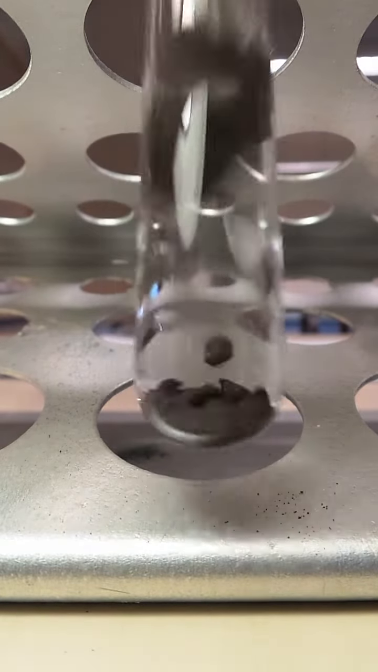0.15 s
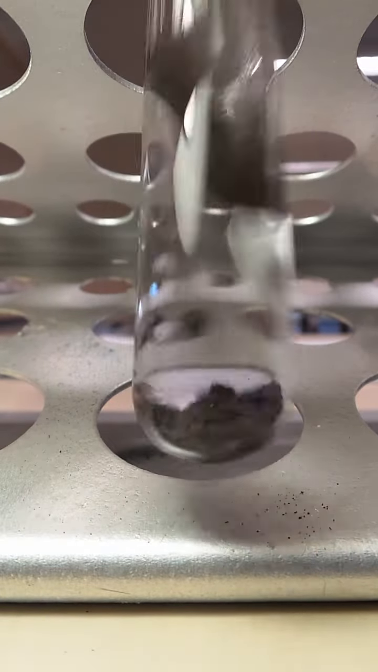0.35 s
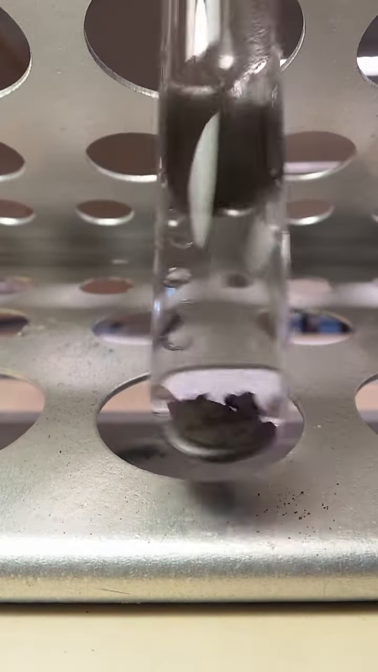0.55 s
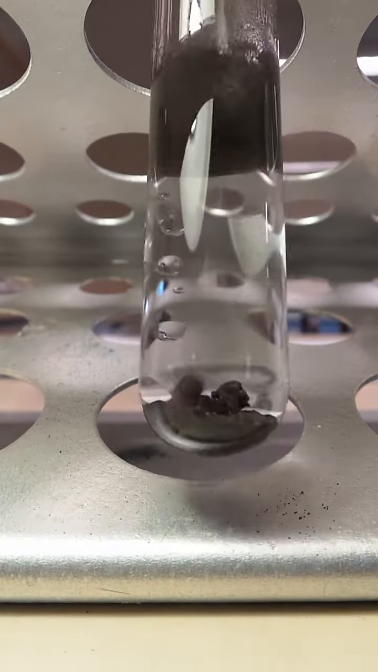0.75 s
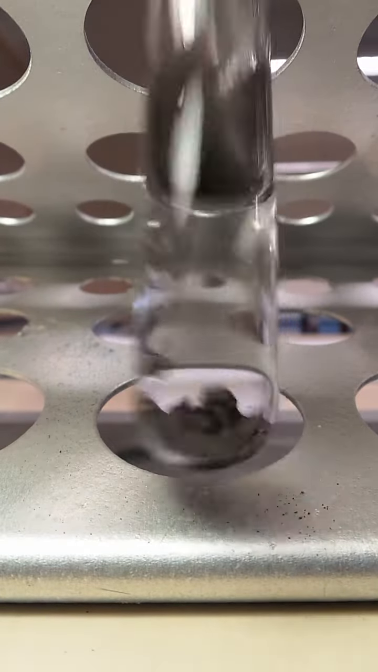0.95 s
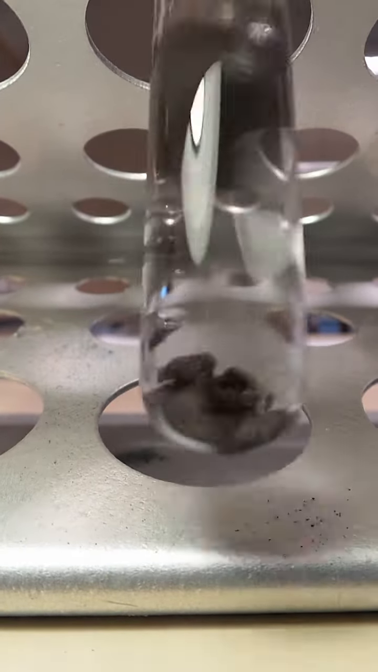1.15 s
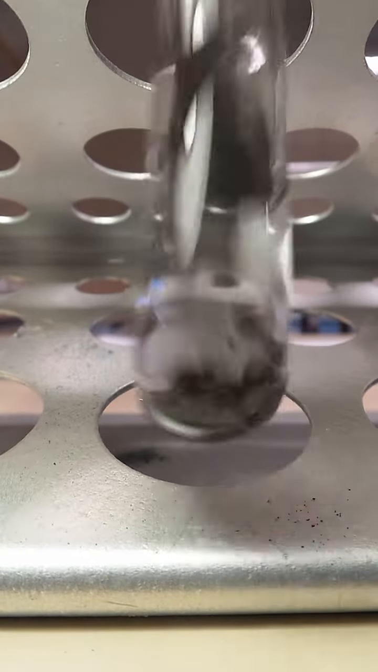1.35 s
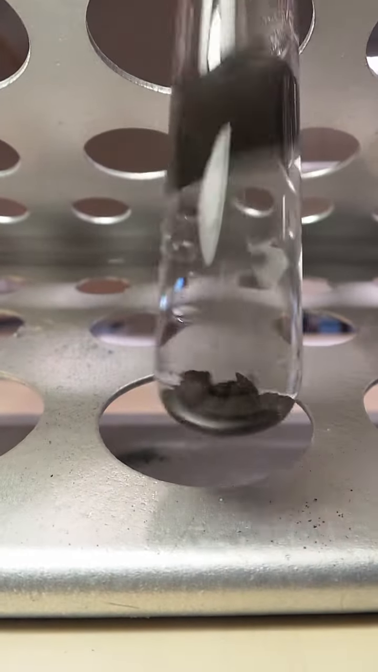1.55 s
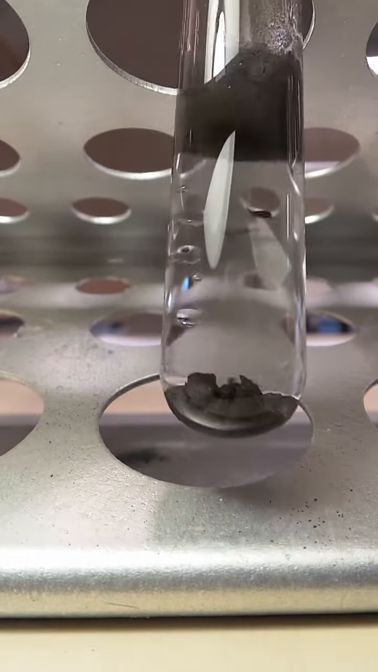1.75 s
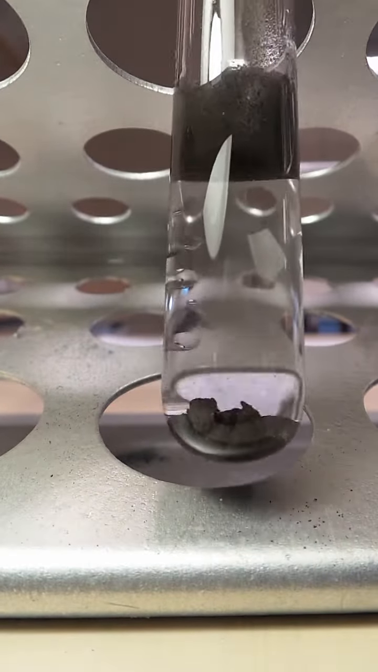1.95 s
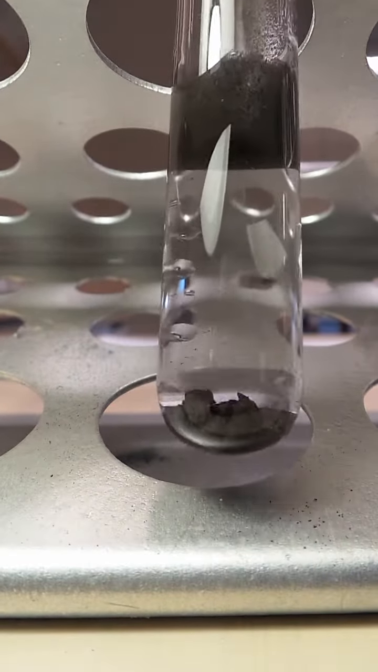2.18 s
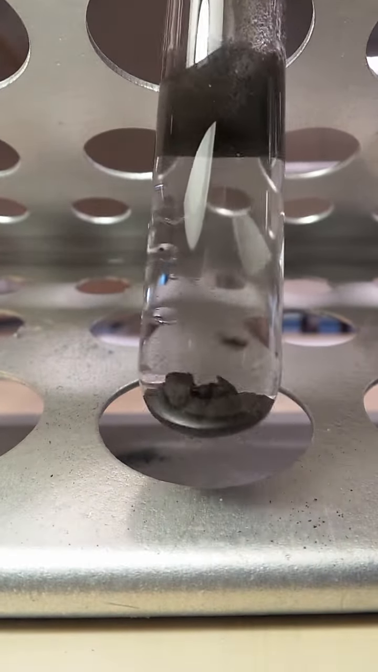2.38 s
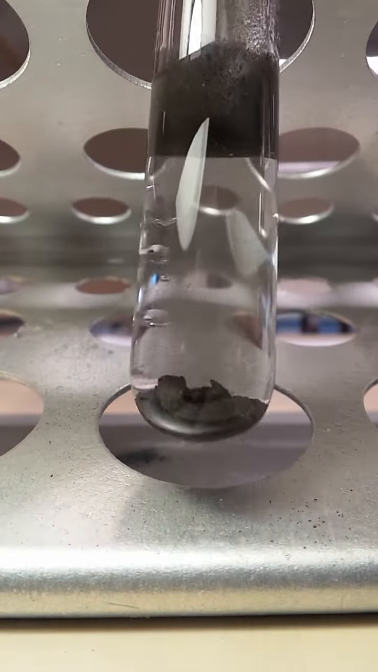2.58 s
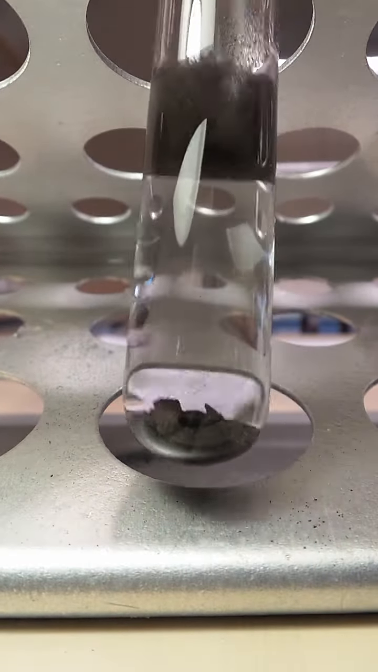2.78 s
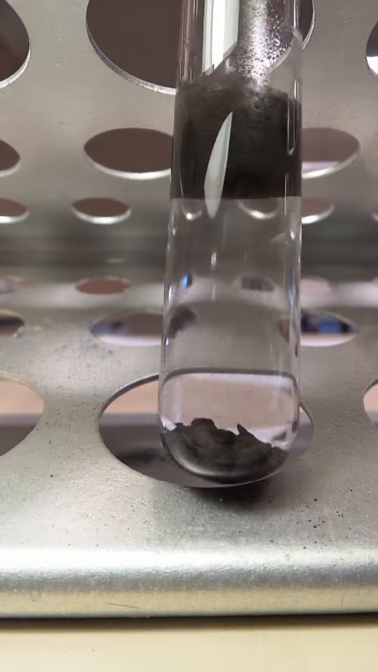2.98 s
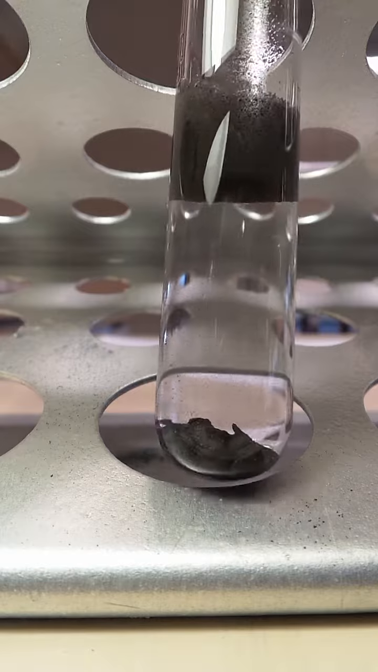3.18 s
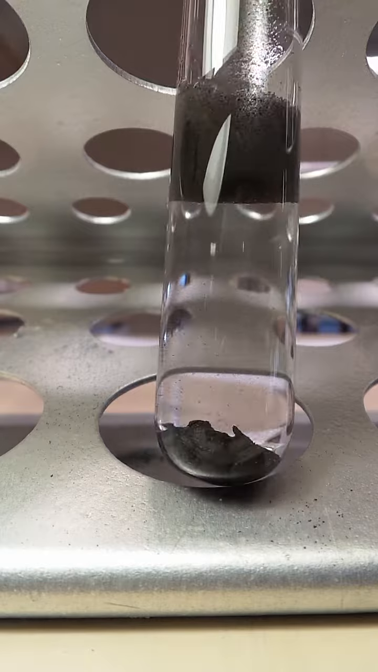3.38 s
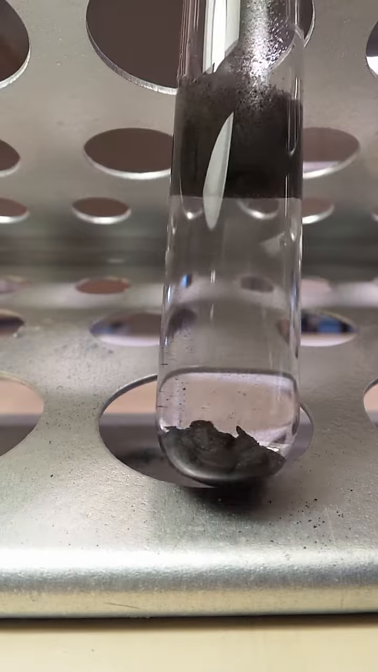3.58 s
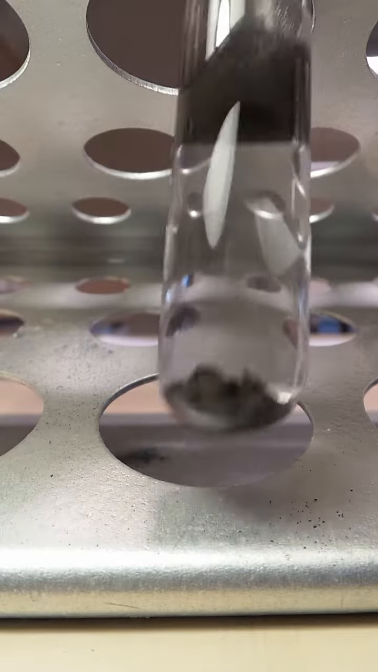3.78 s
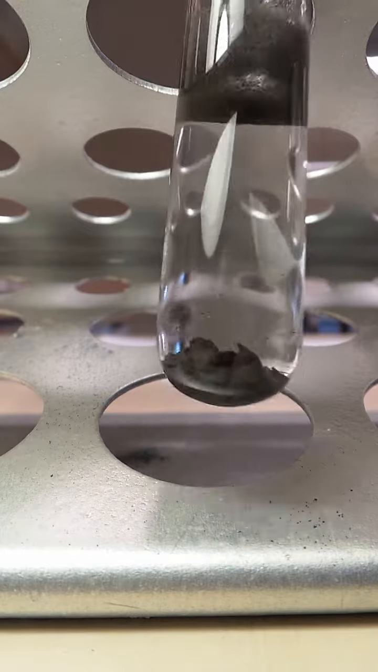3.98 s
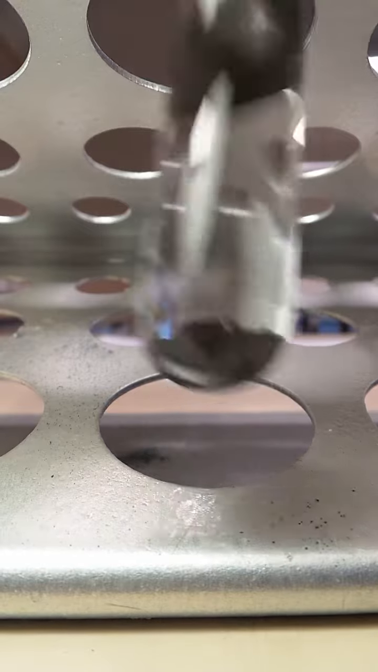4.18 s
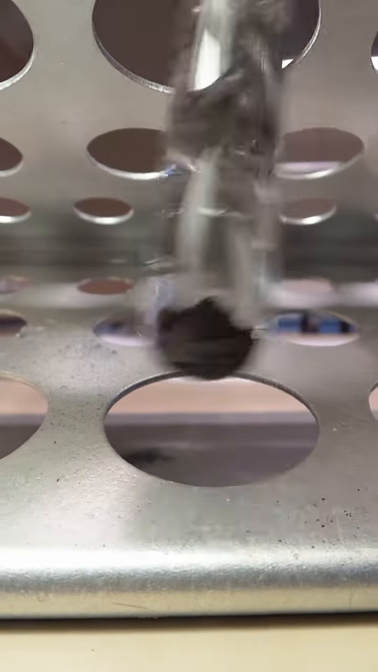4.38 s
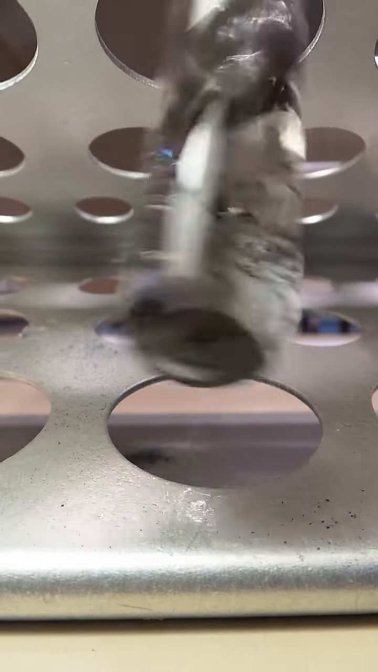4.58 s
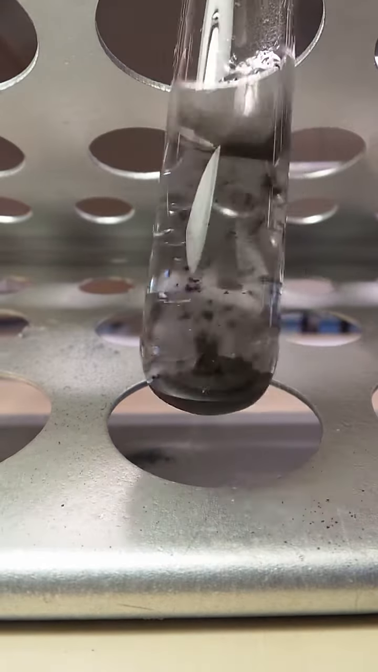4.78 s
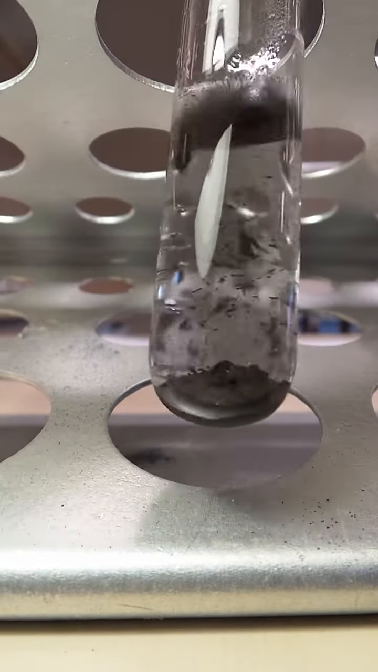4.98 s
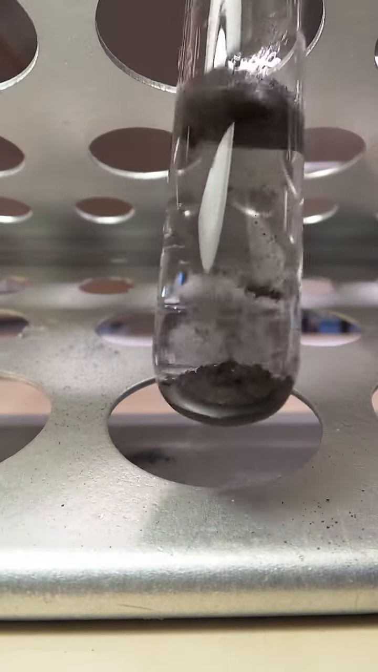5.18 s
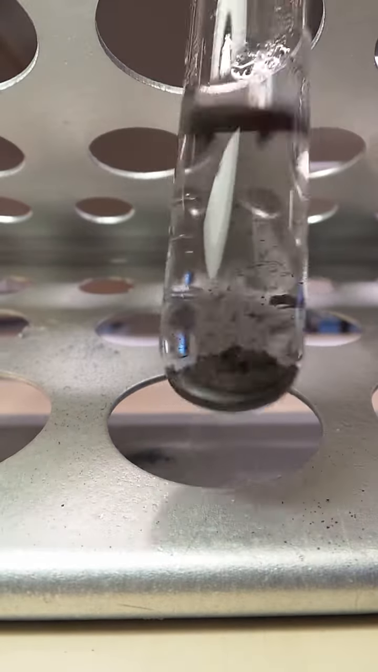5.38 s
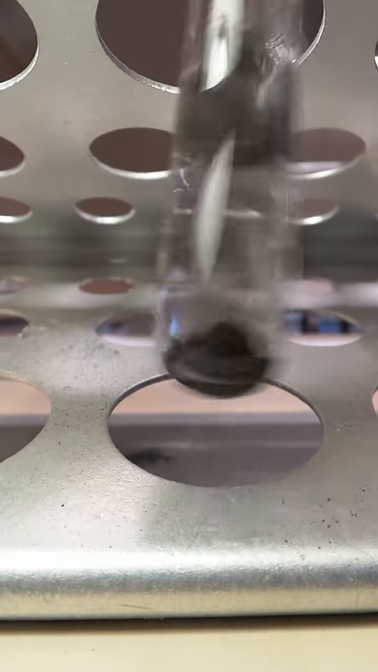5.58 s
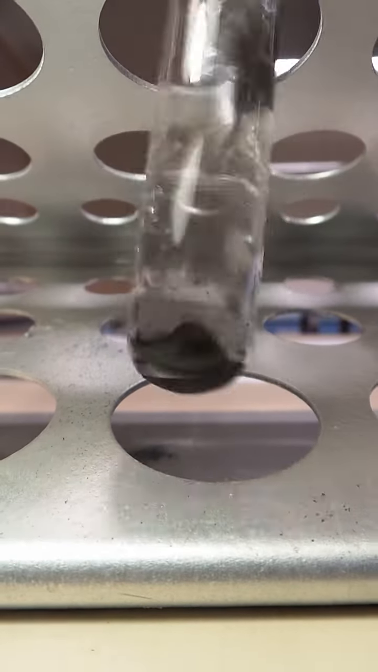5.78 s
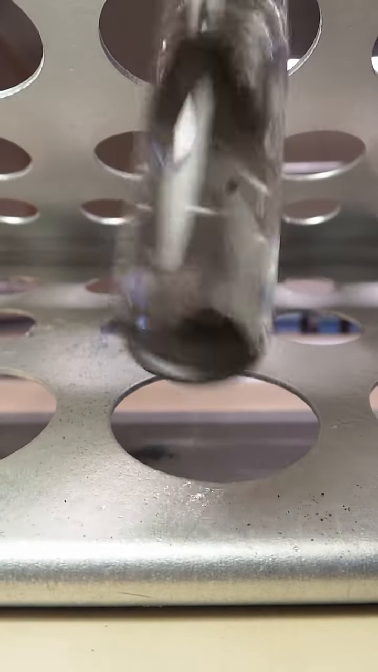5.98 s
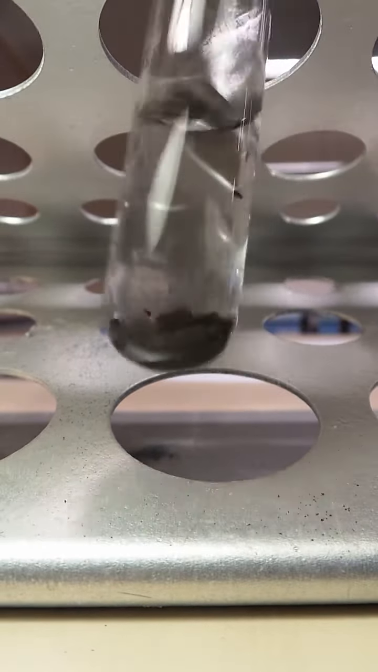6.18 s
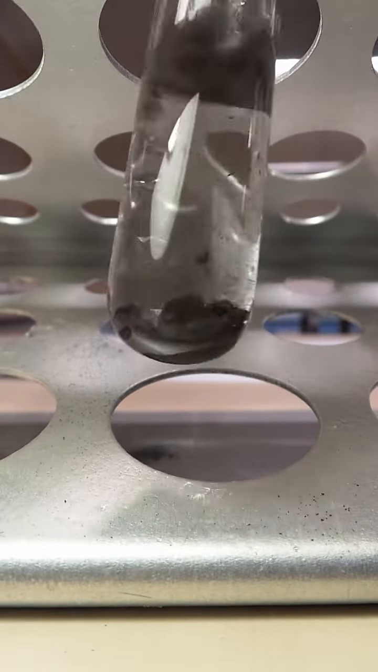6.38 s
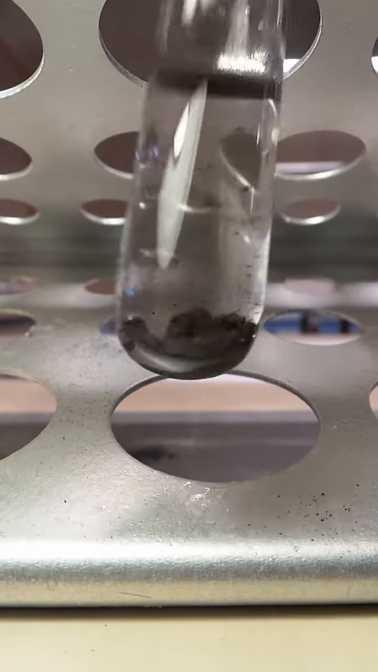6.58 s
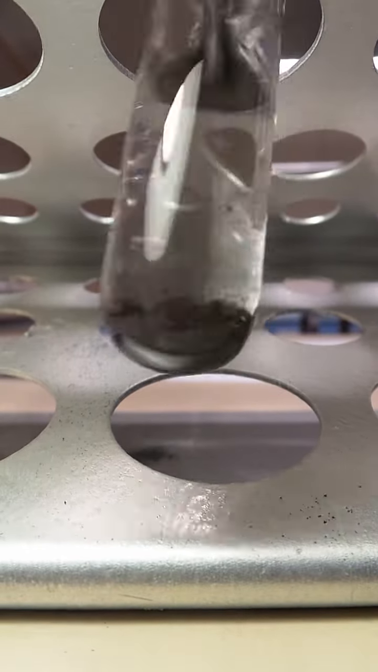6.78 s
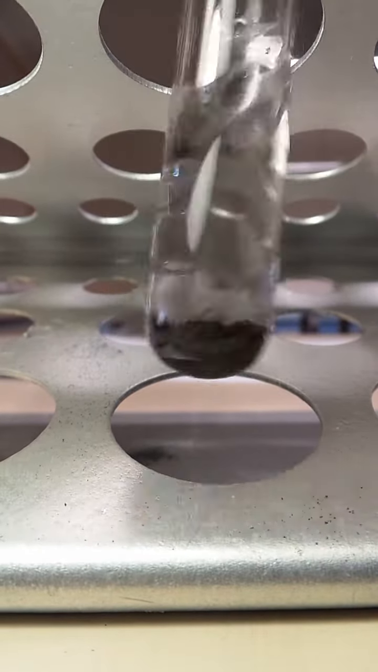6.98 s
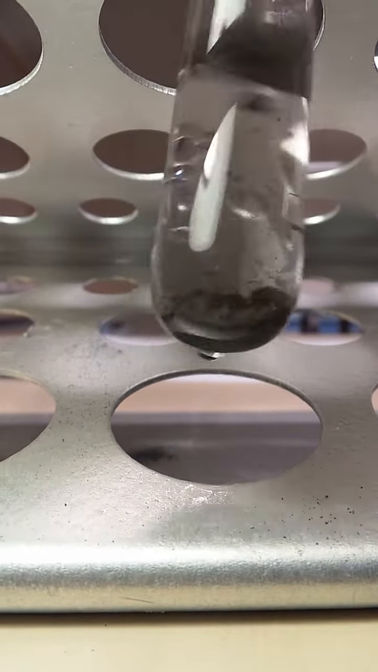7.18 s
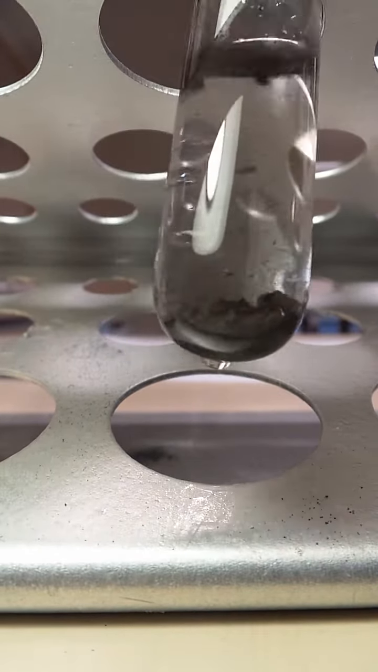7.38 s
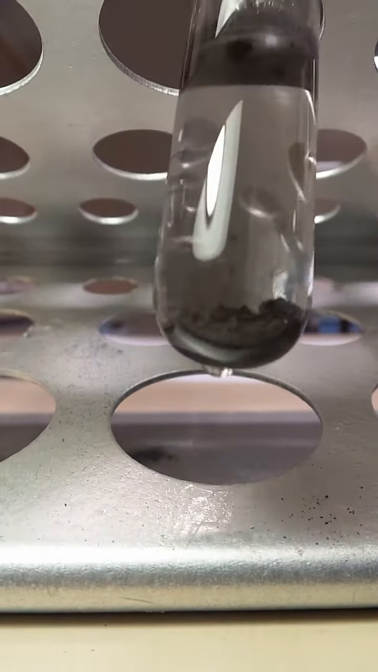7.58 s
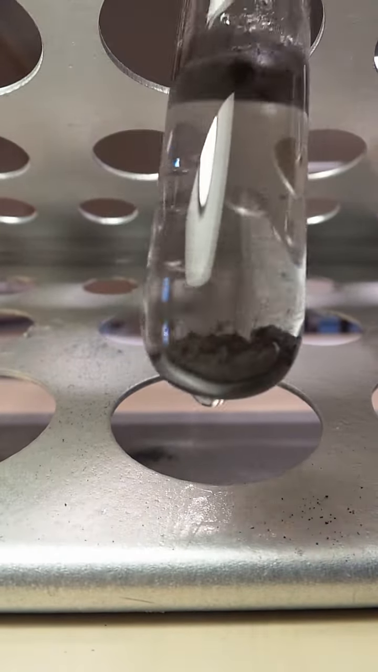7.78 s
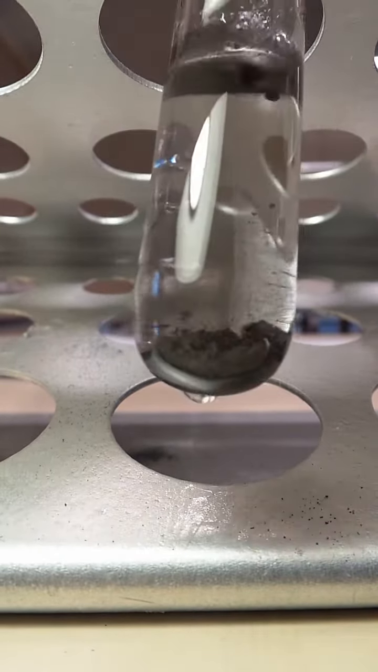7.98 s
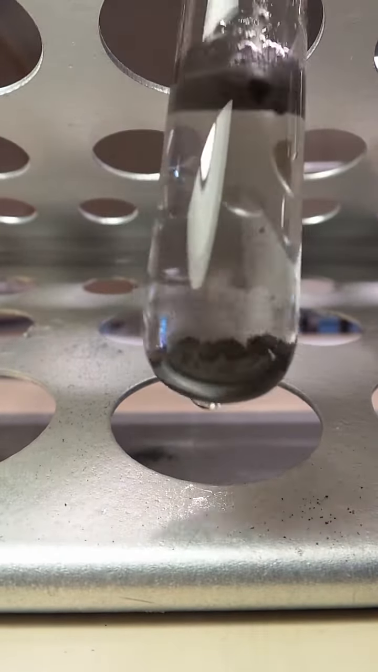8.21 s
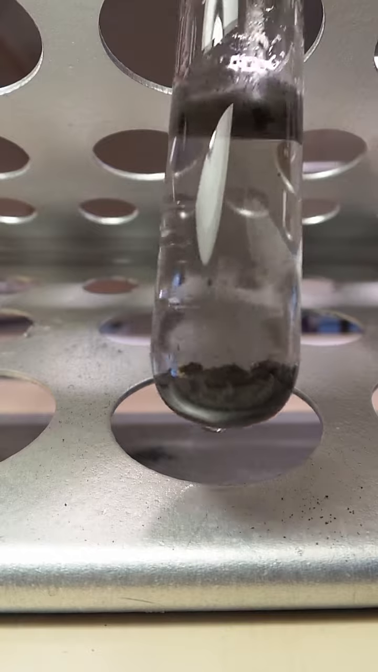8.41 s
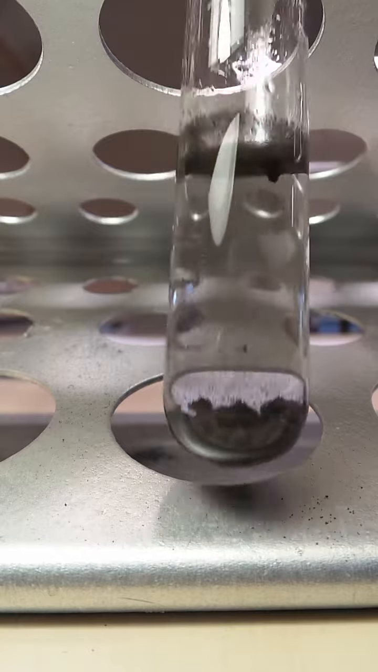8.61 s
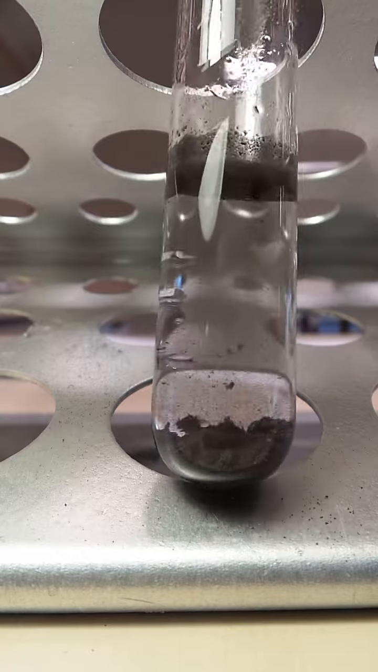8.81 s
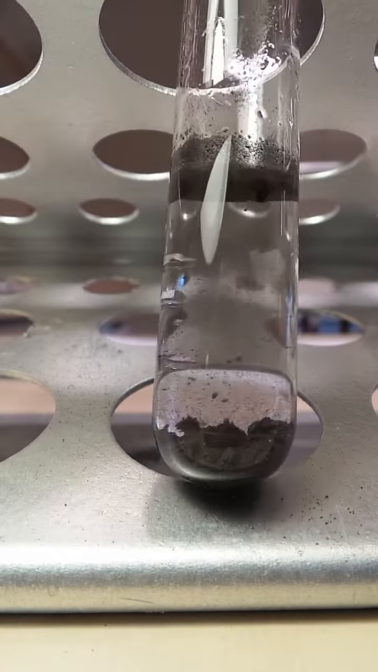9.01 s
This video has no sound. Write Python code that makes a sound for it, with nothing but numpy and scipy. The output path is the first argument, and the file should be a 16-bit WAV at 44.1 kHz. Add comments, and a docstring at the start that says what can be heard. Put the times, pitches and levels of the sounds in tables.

```python
"""Glass test tube shaken in a metal rack

A glass test tube of liquid is shaken by hand in the hole of a perforated sheet-metal rack, close to a phone.
It knocks and rebounds in five bursts; decaying sine waves ring tube and rack, filtered noise gives crack and thud.
Grains of the same ringing make it drag, short sine notes squeak, and decaying noise adds a faint room tail.
Shaped noise hums as ventilation behind it, and the phone's limiter holds down the hardest knocks."""
import sys
import numpy as np
from scipy import signal
from scipy.fft import rfft, irfft
from scipy.io import wavfile
from scipy.ndimage import uniform_filter1d, minimum_filter1d

SR = 44100
rng = np.random.default_rng(int(sys.argv[2]) if len(sys.argv) > 2 else 0)


def master_out(mix):
    """Clip the mix to full scale and print it as 16-bit PCM to the path in sys.argv[1]."""
    frames = np.transpose(np.atleast_2d(mix))
    ceiling = np.clip(frames, -1, 1)
    pcm = np.round(ceiling * 32767).astype(np.int16)
    wavfile.write(sys.argv[1], SR, pcm)


N = 399105  # samples in the scene
RING_SIZE = 24000  # samples in one contact


def undb(db):
    """Turn decibels into gain."""
    return 10 ** (np.asarray(db) / 20)


def gains(points, hz):
    """Gain at hz of (f/Hz, level/dB) points joined by lines on a log-frequency axis."""
    f, db = np.transpose(points)
    return undb(np.interp(np.log(hz + 1), np.log(f), db))


def colour(x, points):
    """Filter with the gain of (f/Hz, level/dB) points; it never acts early, so attacks stay sharp."""
    size = 2 * len(x)
    cepstrum = irfft(np.log(gains(points, np.fft.rfftfreq(size, 1 / SR))))
    # folding the cepstrum onto its first half gives the minimum-phase filter
    cepstrum[1:len(x)] *= 2
    cepstrum[len(x) + 1:] = 0
    response = np.exp(rfft(cepstrum))
    return irfft(rfft(x, size) * response)[:len(x)]


def fade(t, t60):
    """Decay that loses 60 dB in t60 seconds."""
    return np.exp(-np.log(1000) * t / t60)


def add(track, sound, at):
    """Mix a sound into the track at a time in seconds."""
    start = int(at * SR)
    track[start:start + len(sound)] += sound[:N - start]


def ventilation(swell_db=0.5):
    """Rushing air with narrow droning resonances; the flow swells a little."""
    # smooth ventilation noise: f/Hz, level/dB per Hz
    air_points = [(18, -98), (27, -72), (42, -68.5), (80, -52), (200, -52), (290, -58), (430, -70),
                  (620, -65.5), (900, -72), (1400, -80.5), (2300, -82), (4000, -86.5), (7000, -95),
                  (10500, -108), (15000, -113)]
    # duct and room resonances that the fan drives: f/Hz, width/Hz, level/dB per Hz
    resonances = [(100.9, 1.9, -46.5), (260, 9.5, -52.5), (337.3, 27, -54.5), (366.5, 9.5, -52),
                  (394, 19, -58), (464, 22, -59.5), (493, 14.4, -58), (514, 13, -62), (752.6, 12.6, -60),
                  (794, 16, -68.5), (843, 15, -66.5), (1218, 180, -78.5), (1693, 136, -78.5)]
    hz = np.fft.rfftfreq(N, 1 / SR)
    power = gains(air_points, hz) ** 2
    for centre, width, db in resonances:
        power = power + undb(db) ** 2 / (1 + ((hz - centre) / width) ** 2 * 2) ** 2
    air = irfft(rfft(rng.standard_normal(N)) * np.sqrt(power * SR / 2), N)
    flow = signal.resample(rng.standard_normal(size=18), N)  # slow random curve
    return air * undb(swell_db * flow)


def drone(centre_hz=170.2, width_hz=9, level_db=-30):
    """The strongest duct resonance, rung by turbulence, so that it swells and sinks at random."""
    hz = np.fft.fftfreq(N, 1 / SR)
    resonance = 1 / (1 + ((hz - centre_hz) / width_hz) ** 2)
    ring = np.fft.ifft(np.fft.fft(rng.standard_normal(N)) * resonance).real
    return undb(level_db) * ring / np.std(ring)


def room(x, wet_db=-23, low_t60=0.95, high_t60=0.34, split_hz=4500, build_s=0.011, treble_db=-15):
    """Diffuse noise tail, like reflections, that builds up quickly and loses its treble first."""
    t = np.arange(SR) / SR
    low_pass = signal.butter(2, split_hz, fs=SR, output="sos")
    high_pass = signal.butter(2, split_hz, "high", fs=SR, output="sos")
    low = signal.sosfilt(low_pass, rng.standard_normal(SR))
    high = signal.sosfilt(high_pass, rng.standard_normal(SR))
    tail = low * fade(t, low_t60) + undb(treble_db) * high * fade(t, high_t60)
    tail = tail * (1 - np.exp(-t / build_s))
    tail = tail / np.sqrt(np.sum(tail ** 2))  # unit energy
    return undb(wet_db) * signal.fftconvolve(x, tail)[:N]


def squeaks(rise_s=0.0017):
    """Brief pure notes that swell as the glass slips and die as it grips again."""
    # the glass skids on the rim, each time on one note: t/s, f/Hz, level/dB, t60/s
    squeak_notes = [(1.116, 2220, -22, .05), (1.491, 2195, -11.5, 0.063), (1.502, 4292, -18, 0.048)]
    t = np.arange(RING_SIZE) / SR
    out = np.zeros(N)
    for at, hz, db, t60 in squeak_notes:
        envelope = (1 - np.exp(-t / rise_s)) * fade(t, t60)
        add(out, undb(db) * np.sin(2 * np.pi * hz * t) * envelope, at)
    return out


def drag(grains_per_s=550, spread_db=2.0, treble_db=-6, ring_length=0.7, light=0.3, spot_count=4):
    """Glass chattering along the edge of the hole: tiny slips at a few spots, each ringing tube and rack."""
    # times when the tube drags along the rim: start/s, end/s, relative level/dB
    drag_times = [(1.485, 1.55, -29), (4.39, 4.492, -35), (4.53, 4.587, -25), (4.603, 4.68, -38),
                  (4.677, 4.753, -33.5), (5.804, 5.9, -32.5), (7.11, 7.17, -36.5)]
    t = np.arange(N) / SR
    pressure = np.zeros(N)
    for start, end, db in drag_times:
        arch = np.sin(np.pi * np.clip((t - start) / (end - start), 0, 1))
        pressure += undb(db) * arch.clip(0) ** .5
    chatter = np.zeros(N)
    for _ in range(spot_count):
        happens = rng.random(N) < grains_per_s / spot_count / SR
        slips = happens * undb(spread_db * rng.standard_normal(N))
        chatter += signal.oaconvolve(slips, clink(ring_length, light, clank_hz=2100))[:N]
    chatter = colour(chatter, [(700, 1), (2800, 3), (4100, -6.5), (5400, 10), (6600, -5.5),
                               (8000, 1.5), (11000, treble_db)])
    return pressure * chatter / np.std(chatter)


def thud(level_db=-8, low_hz=240, high_hz=880, t60=0.61, rise_s=0.0011):
    """The whole rack flexes under a knock: low, slower to start and slower to die."""
    t = np.arange(RING_SIZE) / SR
    band = signal.butter(2, [low_hz, high_hz], "band", fs=SR, output="sos")
    flex = signal.sosfilt(band, rng.standard_normal(RING_SIZE))
    return undb(level_db) * flex * fade(t, t60) * (1 - np.exp(-t / rise_s))


def after_ring(light, light_db=-1.0, scatter_db=5.0, detune=0.0011, waver=0.0013, slosh_hz=28):
    """The thin, long ring of the glass; sloshing liquid wavers and detunes it, so successive knocks beat."""
    # glass modes that the hand hardly damps, so they sing on between knocks: f/Hz, relative level/dB, t60/s
    glass_modes = [(4145, -37, .3), (4472, -29.5, 0.32), (6565, -36, 0.26), (7947, -33.5, .3),
                   (9420, -36.5, 0.59), (11265, -36.5, .3), (11650, -30, 0.47), (13322, -34, .34)]
    t = np.arange(RING_SIZE) / SR
    hz, db, t60 = np.transpose(glass_modes)[:, :, None]
    spot, slosh, pace = rng.standard_normal((3, len(hz), 1))
    # all modes waver together, at a random rate and phase; detune and waver are fractions of the pitch
    wobble = np.sin(2 * np.pi * (slosh_hz * np.exp(pace[0] / 2) * t + pace[1]))
    bend = detune * slosh + waver * wobble
    swing = np.sin(2 * np.pi * hz * np.cumsum(1 + bend, axis=1) / SR)
    gain = undb(light * light_db + db + scatter_db * spot)
    return np.sum(gain * fade(t, t60) * swing, axis=0)


def clink(length, light, clank_hz, modes_db=-7, scatter_db=2.5, detune=0.0011, crack_db=-10, crack_t60=0.034,
          sheet_db=-18, sheet_t60=0.28, light_db=-3.0, damping_db=-3, top_damping_db=-10):
    """Glass meets metal: clear modes, a hard crack and the sheet's wash; light taps (0-1) favour other modes.

    The length factor scales every decay time.
    """
    # what tube and rack ring with: f/Hz, relative level in a hard knock/dB,
    # t60 before the length factor/s, extra level in a light tap/dB
    clear_modes = [(464.7, -10.5, 0.17, 2), (720, -2.5, 0.079, 0), (786, -15.5, 0.1, -4),
                   (893, -15, 0.12, 3), (983, -27.5, 0.049, 5), (1116, -12.5, 0.13, -5.5),
                   (1195, -11, 0.059, 2), (1624, -5, 0.023, -3.5), (1798, -4, 0.074, -3.5),
                   (2002, -2.5, 0.056, 1), (2122, -5.5, .04, -2), (2468, -4.5, 0.062, -3),
                   (2610, -7, 0.03, 3), (2670, -11.5, .06, -0.5), (2893, -8.5, 0.06, 2),
                   (3400, -14.5, .09, 4), (3650, -2.5, 0.027, 4.5), (3986, 7.5, 0.045, -8),
                   (4115, 14.5, 0.026, -10.5), (4190, -0.5, 0.09, -7.5), (4350, -4.5, .04, -4.5),
                   (4460, -6, 0.11, -7), (4550, -6, 0.037, -2), (4670, -2, 0.07, -4),
                   (4920, -1.5, 0.031, -3), (5100, -6.5, 0.056, 1.5), (5635, -4, 0.055, 4),
                   (6557, 4, 0.071, 0.5), (6636, -3.5, 0.08, 1), (6990, 2.5, 0.05, -7.5),
                   (7440, -4, .035, -8.5), (7930, -2, 0.086, -5), (8300, -14.5, 0.11, 4),
                   (8600, -9, 0.12, 1), (8990, -11, 0.06, -1), (9404, 4.5, 0.06, -4.5),
                   (10220, 1, 0.031, -8), (10600, 1, 0.022, -11.5), (11000, -4.5, .04, -8),
                   (11200, -9.5, 0.12, 9.5), (11800, -4, .025, -3.5), (11860, -9.5, 0.12, 9),
                   (12480, -8, .035, -4.5), (13150, -3, .03, -3), (13230, -3.5, 0.076, 6),
                   (13900, -5, .025, -1.5), (14490, -3.5, 0.041, -12.5)]
    # the crowded, well damped modes of the perforated sheet: f/Hz, relative level/dB
    sheet_points = [(150, -3.5), (400, 0), (660, 7.5), (1000, 0.5), (1400, 6), (2100, 11.5), (2700, 10),
                    (3200, 9), (4200, 16), (4800, 7), (6000, 10.5), (9000, 7), (11500, 13.5), (12400, -7),
                    (13200, 10.5), (14500, 0.5)]
    main_mode_db, main_share = 1, 0.67  # louder modes answer every knock, with only this share of the scatter
    tap_modes_db = -1.5  # change of all clear modes in a light tap
    t = np.arange(RING_SIZE) / SR
    clank = (clank_hz, 2.0, 0.044, -5)  # one more mode, in the same columns
    hz, db, t60, tap_db = np.transpose(list(clear_modes) + [clank])[:, :, None]
    # each contact lands on another spot, and the grip and the moving liquid shift the modes a little
    spot, grip, side = rng.standard_normal((3, len(hz), 1))
    spot = spot * np.where(db > main_mode_db, main_share, 1)
    early = t[:RING_SIZE // 2]
    swing = np.sign(side) * np.sin(2 * np.pi * hz * (1 + detune * grip) * early)
    gain = undb(db + light * (tap_db + tap_modes_db) + scatter_db * spot)
    modes = np.sum(gain * fade(early, t60 * length) * swing, axis=0)
    modes = np.pad(modes, (0, RING_SIZE - len(early)))
    noise = rng.standard_normal(RING_SIZE)
    crack = undb(crack_db) * fade(t, crack_t60 * length) * noise
    # the sheet shivers on after the crack, with less treble
    shiver = undb(sheet_db) * fade(t, sheet_t60 * length) * noise
    shiver = colour(shiver, [(4000, 0), (9000, damping_db), (13000, top_damping_db)])
    wash = colour(crack + shiver, sheet_points)
    return undb(modes_db) * modes + undb(light * light_db) * wash


def contact(db, clank_hz, clank_db, bite_db, ring_db, ping_db, sparkle_db, hard_db=-18, range_db=9, low_db=4,
            low_share=0.65, body_db=5, top_db=1.0, tap_top_db=-0.5, ring_length=0.82, press_s=0.00025):
    """One knock: firm ones are choked short, light ones favour other modes; the spot hit sets what stands out."""
    # above firm_db the glass is pressed on the metal; its ring halves with each halving_db more
    firm_db, halving_db = -16, 10.5
    light = np.clip((hard_db - db) / range_db, 0, 1)
    length = ring_length * 2 ** (-max(db - firm_db, 0) / halving_db)
    low = low_db + low_share * clank_db
    top = top_db + sparkle_db + light * tap_top_db
    tilt = [(700, low), (2000, body_db + clank_db), (4100, 0), (4750, bite_db),
            (6600, ring_db), (9400, ping_db), (11300, top)]
    press = 1 - np.exp(-np.arange(RING_SIZE) / SR / press_s)  # very quick onset
    ringing = clink(length, light, clank_hz) + after_ring(light) + thud()
    return undb(db) * colour(press * ringing, tilt)


def tube(level_db=2.5, wait_spread=0.26, rebound_spread_db=-1.0):
    """All knocks; after a strong one the tube bounces back and touches the rim again faintly."""
    # contacts of tube and rack: t/s, relative level near 4 kHz/dB, pitch of the rack's clank f/Hz,
    # then against that level: clank near 2 kHz/dB, bite near 4.7 kHz/dB, ring near 6.6 kHz/dB,
    # ping near 9.4 kHz/dB, sparkle above/dB
    knock_list = [(0.2962, -20, 1920, -0.5, 3, -3.5, -1, -6), (0.3384, -32, 2010, -2, 5, 6.5, 1.5, 6),
                  (0.4345, -30.5, 1990, 2.5, -3, -6, -2.5, -8), (0.5509, -25.5, 2000, 1, 2, -1.5, 0, -4),
                  (0.5874, -42, 2050, 5.5, -1, 8.5, -1, 7.5), (1.029, -18.5, 1980, 3.5, 6, 2, -1, 1.5),
                  (1.056, -25, 2020, -8, 0.5, -3, -2, -8), (1.064, -30.5, 2020, 0, -6, -4, -6, -4),
                  (1.1153, -22, 2130, 7, 4, 5.5, 10.5, -3), (1.131, -24, 2150, -1.5, -2, 8, -11, 4),
                  (1.1736, -22, 1990, -1.5, -2, 6.5, -6, 6), (1.204, -45, 2020, 1, 1.5, -1, 0.5, 9.5),
                  (1.3143, -20.5, 2026, 1.5, 7, 0.5, -8, -0.5), (1.353, -37.5, 2090, -2, -0.5, 2, 3, 4),
                  (1.3709, -27.5, 2150, -6, -6, 3, -5, -1.5), (1.38, -25, 2090, -4.5, -8, -6, -3.5, -13),
                  (1.4308, -19.5, 2075, 3.5, 5.5, 3.5, 6, 3.5), (1.4903, -21, 2100, 5.5, 1, 0, 9, -4),
                  (1.503, -23.5, 2190, -5, 3, 4.5, 5, -3), (1.5195, -26, 1950, -6, -3, 7.5, -9, 5.5),
                  (1.5491, -30.5, 2070, 3, 5, 6, -3, 3), (1.605, -40.5, 2100, 5, 2, -2, -4, -7),
                  (4.083, -50.5, 2000, 0, 0, -4, 17, -1), (4.232, -34.5, 2020, 7.5, 11, -1, 7, 1),
                  (4.2995, -24, 1930, 2.5, 5, 0, 0, -5.5), (4.3392, -33.5, 1990, 3, 4, 9, 2, 11),
                  (4.369, -43, 2050, 2, 3, -1, -1, 2), (4.382, -12.5, 1970, -7, -3, -0.5, -6, 0),
                  (4.409, -31.5, 2100, 4.5, -3, -9, -7.5, -5), (4.424, -34, 2100, -5, 0, -4.5, -5.5, 1),
                  (4.4388, -16.5, 2160, 3, 2, -1.5, 0, -3), (4.4905, -46, 2020, -4, 0, 1, 3, -8),
                  (4.5076, -12.5, 2040, -6.5, -4, -7.5, -12, -5.5),
                  (4.532, -23, 2100, -9.5, 1, -17, -5.5, -2), (4.5536, -24.5, 2160, -0.5, 6, 4, -1, -3),
                  (4.565, -18, 2250, 2, -2, -0.5, -3.5, -4.5), (4.6268, -23.5, 2020, 1, 1, 3, -3, 3.5),
                  (4.654, -35, 2110, 2, -3, -5, -4, -1), (4.6655, -31, 2050, 7, -2, -7, -6.5, 2),
                  (4.6883, -22.5, 2040, -0.5, -6, 1, -8, -8), (4.698, -27, 2100, -3, 7, 2, -10, -7),
                  (4.731, -31, 2110, -14, 0, -1, -10, -8), (4.742, -45, 2110, 2, 1, -4, -8, -9),
                  (4.755, -36, 2000, 3, 5, -6, 2, -12), (5.466, -44, 2060, -3, 4, -3.5, -2.5, -13),
                  (5.6464, -16.5, 1870, 1, -3.5, 0.5, 2.5, 0), (5.693, -38, 2060, 0, 0, 1, -2.5, 3),
                  (5.708, -36.5, 2080, 4, 6, 5, -6, -3), (5.7603, -16, 2010, -3.5, 2, 0.5, 1, -1),
                  (5.8061, -29.5, 2080, -1, 8, 0, 3, 4), (5.8198, -17, 2050, -1, -3.5, -2, 2, -2),
                  (5.839, -23.5, 2140, -3, 5.5, 0, -5, -5), (5.8778, -33.5, 2140, 5, 5, 7, 7, 9),
                  (5.919, -36, 2100, 3, 5, 3, 3, 2), (5.9544, -18, 2020, 0.5, -0.5, -1.5, 4, -2),
                  (5.971, -35, 2050, -5, 4, 5, -5, -6), (6.011, -35, 2100, 0, 0, 4, -1, -3),
                  (6.023, -18, 2030, -2, 6.5, 0.5, -1, 0.5), (6.0749, -34.5, 2000, 2, -1, 6, -5, 6),
                  (6.088, -34, 2060, -3, 1, 9, 7, 8), (6.16, -27, 2110, 1, 2, 0, 2, -6),
                  (6.237, -45, 2050, -6, 4, -1, 2, -4), (6.6741, -18.5, 1990, -2, 0, -1, -8.5, -5),
                  (6.72, -26.5, 2090, -6, 1, -2, -7, -7), (6.8305, -16, 2020, 1.5, 6, 3, -2.5, -2),
                  (6.8959, -32, 2120, -4, 10, 4, 4, -3), (6.9227, -25, 2050, -0.5, 1, 6.5, -1, 4),
                  (6.9814, -16, 2000, -4, 4.5, -3.5, -8.5, -2.5), (7.0512, -31.5, 2180, 2.5, 8, 4.5, 5, 5),
                  (7.1176, -20, 1980, -2.5, -2, -5.5, -5, -9), (7.159, -45, 2040, 9, 0, -2, -5, -11)]
    bounce_db = -24  # weaker contacts do not rebound
    rebound_s, rebound_db = 0.027, -21.5  # typical wait and strength of the rebound against its knock
    out = np.zeros(N)
    chances = rng.standard_normal((len(knock_list), 2))
    for (at, db, *spot), (wait, strength) in zip(knock_list, chances):
        add(out, contact(db, *spot), at)
        if db > bounce_db:
            faint_db = db + rebound_db + rebound_spread_db * strength
            add(out, contact(faint_db, *spot), at + rebound_s * np.exp(wait_spread * wait))
    return undb(level_db) * out


def scene(side_db=-26):
    """All sits in the middle; a very faint, independent noise tail is added to one channel, subtracted in the other."""
    knocks = tube() + drag() + squeaks()
    mid = knocks + room(knocks) + ventilation() + drone()
    side = undb(side_db) * room(knocks)
    return np.array([mid + side, mid - side])


def record(dry, ceiling=1.0, hold_s=0.0011, top_hz=14650):
    """A look-ahead limiter ducks the loudest peaks, then everything above top_hz is cut."""
    size = max(int(hold_s * SR), 2)
    allowed = np.minimum(1, ceiling / (np.abs(dry).max(axis=0) + 1e-9))
    # hold the lowest gain around each peak, then smooth it
    limited = dry * uniform_filter1d(minimum_filter1d(allowed, size), size)
    top_cut = signal.ellip(8, .2, 70, top_hz, fs=SR, output="sos")
    return signal.sosfilt(top_cut, limited)


dry = scene()
out = record(dry)
master_out(out)
```